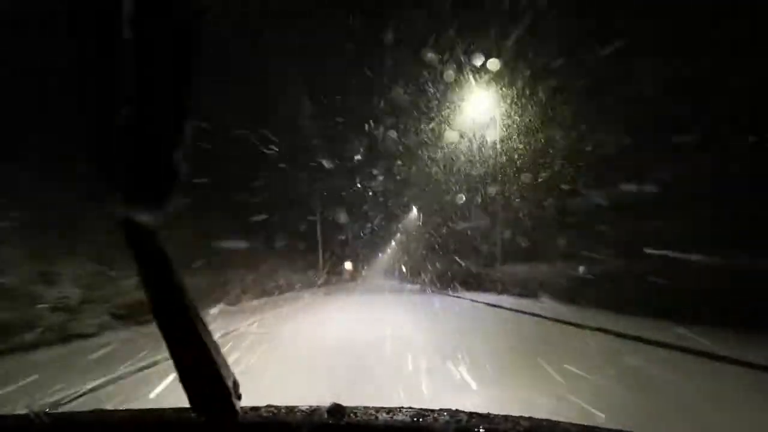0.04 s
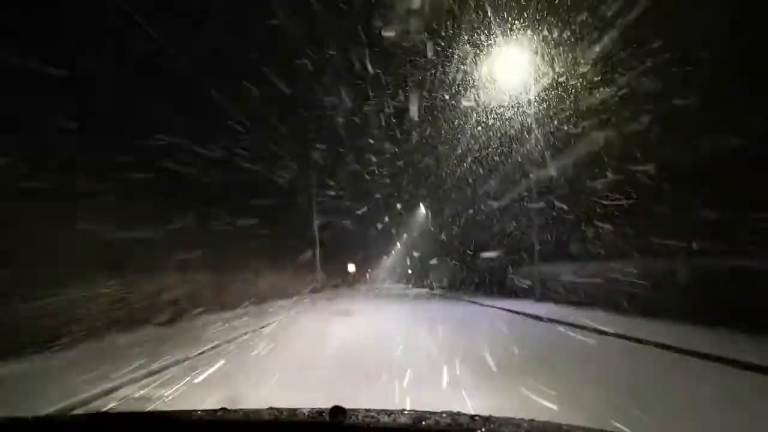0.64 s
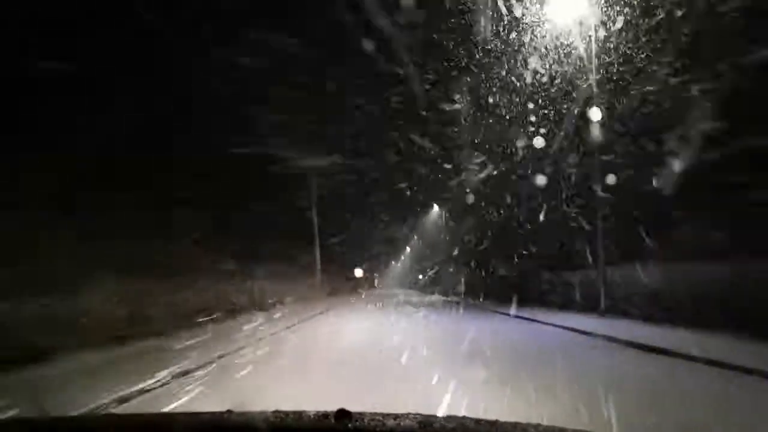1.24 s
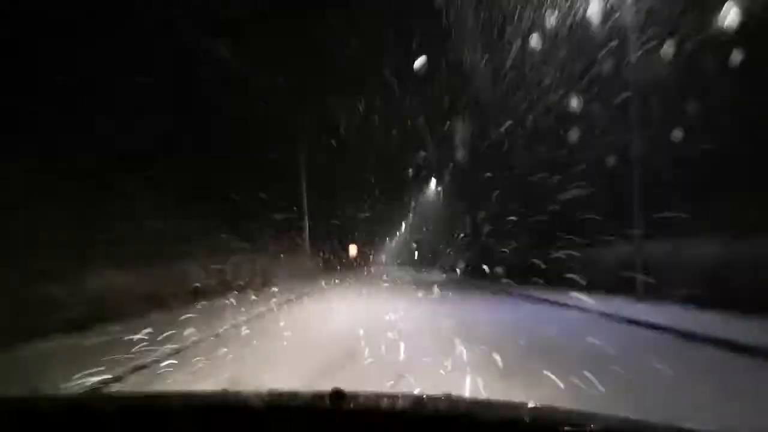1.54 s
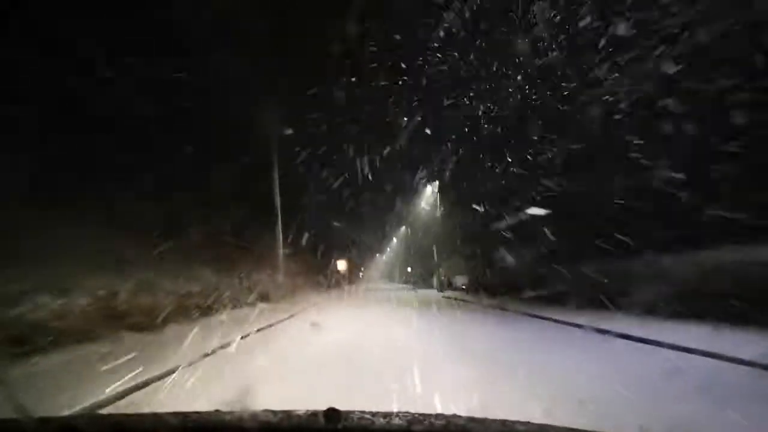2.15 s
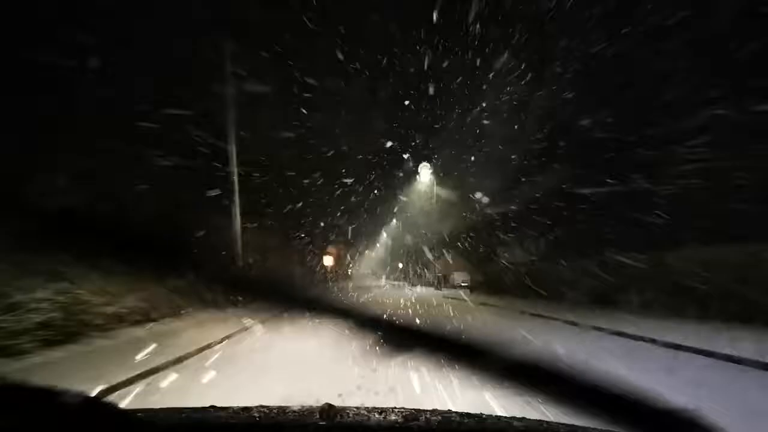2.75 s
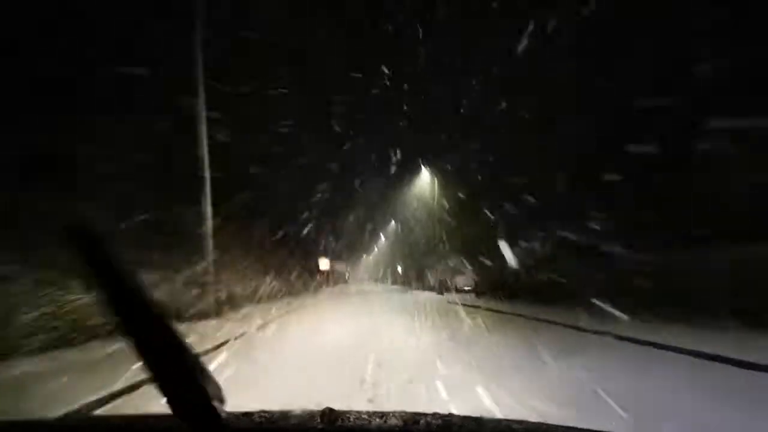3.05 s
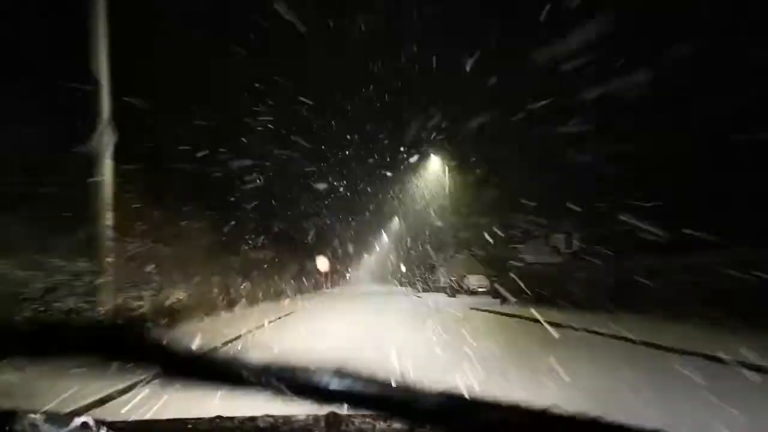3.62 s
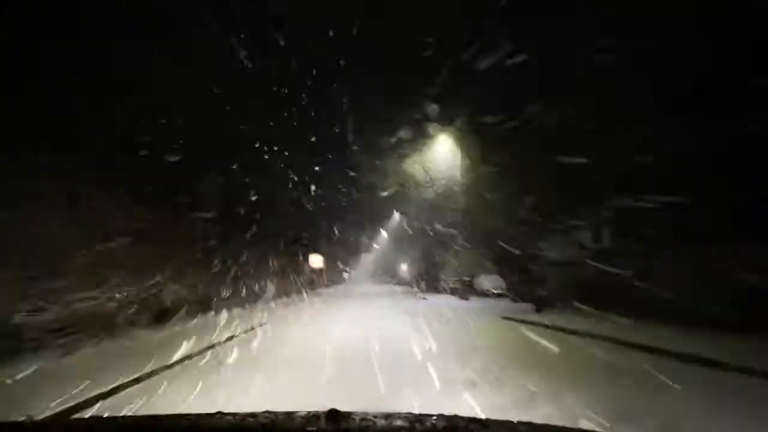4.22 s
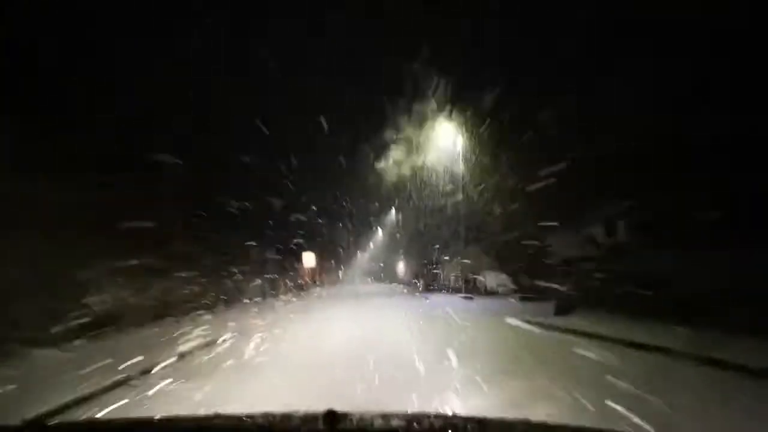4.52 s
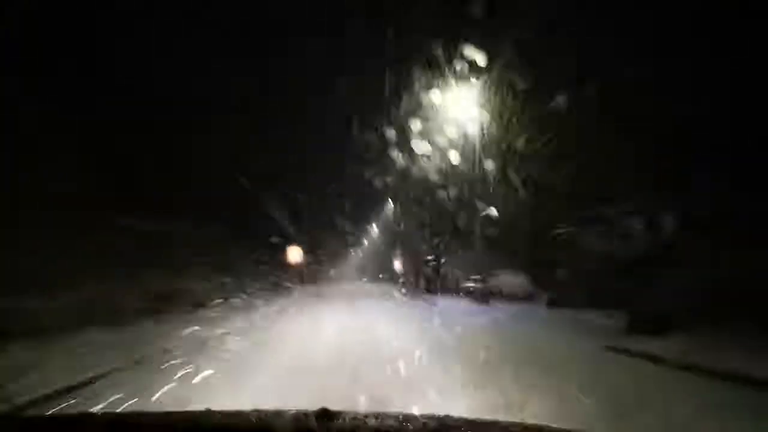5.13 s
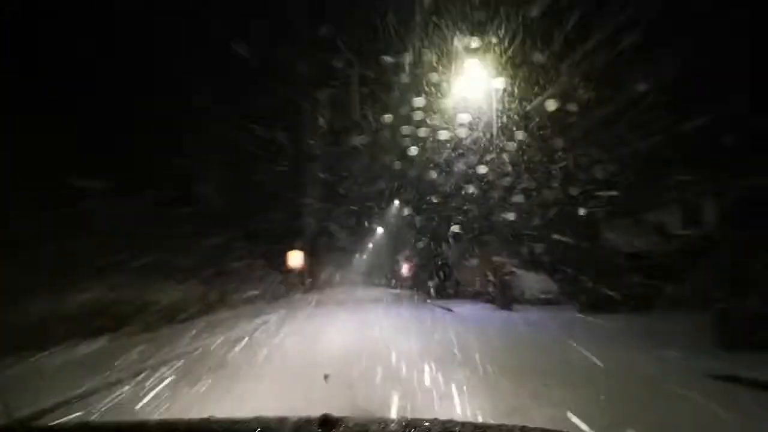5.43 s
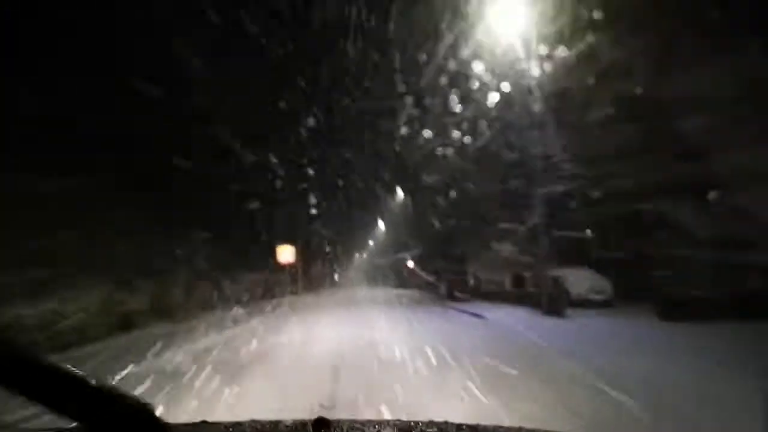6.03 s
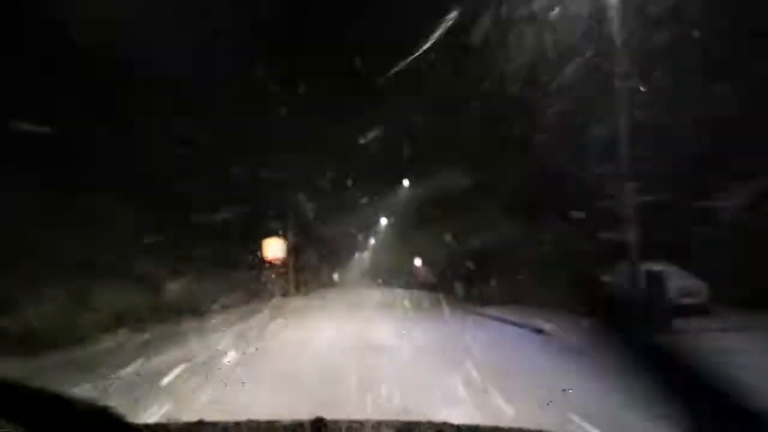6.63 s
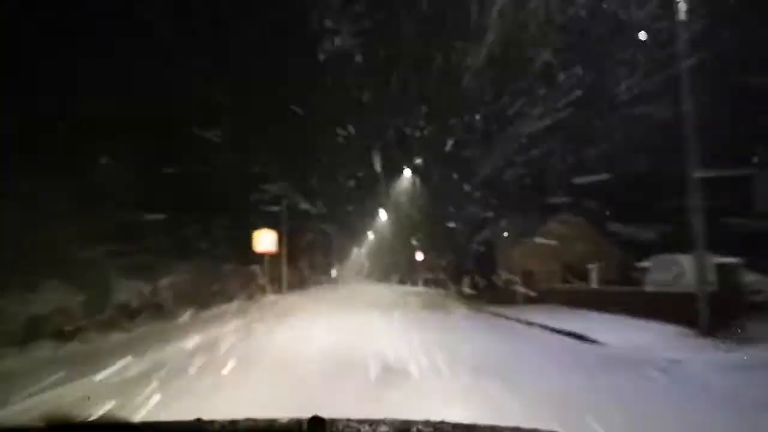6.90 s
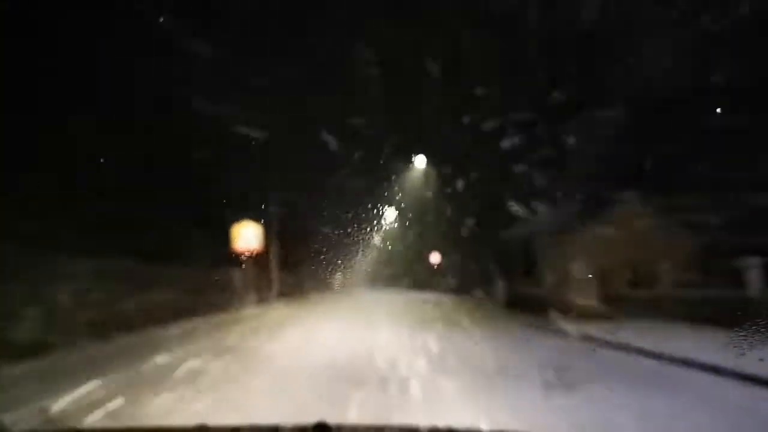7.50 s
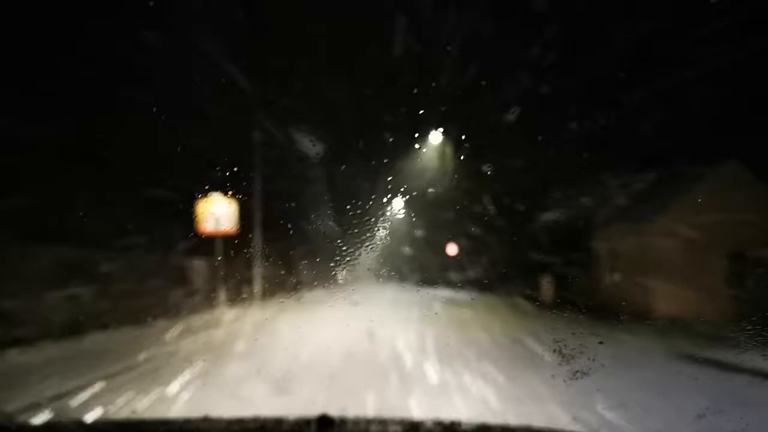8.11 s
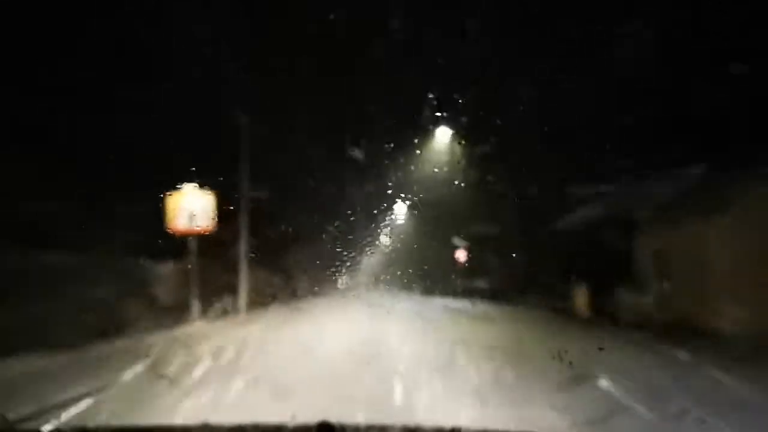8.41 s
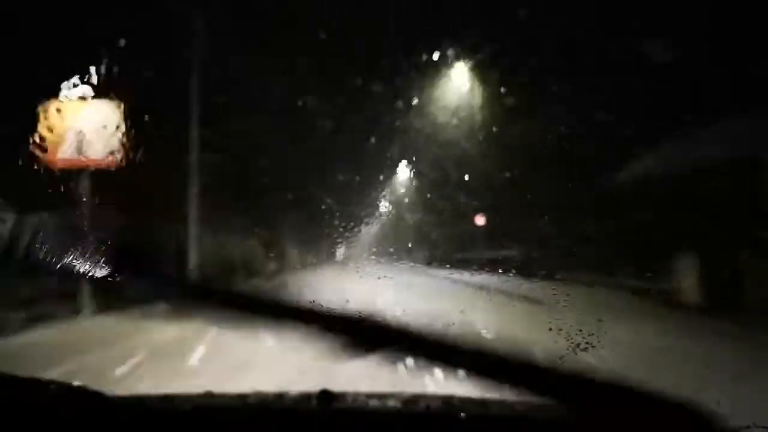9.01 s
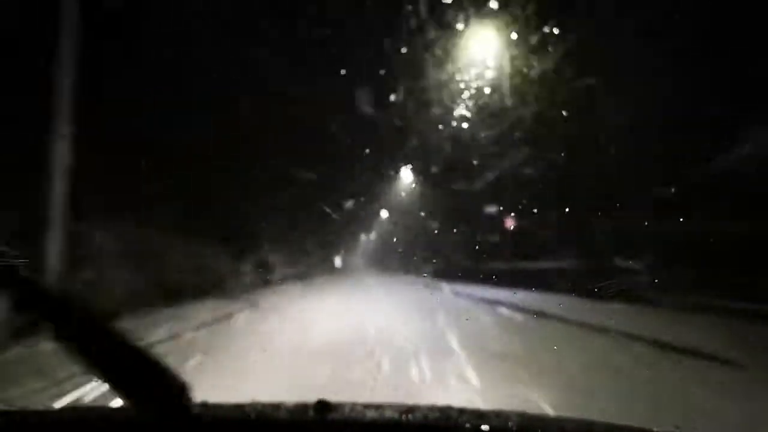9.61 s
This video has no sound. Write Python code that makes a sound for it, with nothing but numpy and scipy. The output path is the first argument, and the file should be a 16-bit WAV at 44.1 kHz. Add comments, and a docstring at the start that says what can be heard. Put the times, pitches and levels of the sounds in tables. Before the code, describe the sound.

A low engine drone and tyre rumble fill a car cabin, with intermittent windscreen wipers, ticking grit and a few dull knocks.

```python
"""Inside a car driving slowly on a snowy road at night. The engine makes the cabin boom, the tyres
rumble and swish, snow hisses finely, and grit and ice tick on the body. Halfway the road turns
rutted: the boom wavers more, the tyres thud and loose plastic trim rattles more often. About every
three seconds the rubber wipers judder loose, squeak, drag back and clack to rest. A few dull knocks
come through the body, the heaviest with a thump."""
import sys
import numpy as np
from scipy.fft import rfft, irfft, next_fast_len
from scipy.io import wavfile
from scipy.ndimage import map_coordinates

SR = 44100
rng = np.random.default_rng(int(sys.argv[2]) if len(sys.argv) > 2 else 0)


def wrap_up_sound(samples):
    """Save the sound to the file named by the first command line argument, as 16-bit audio."""
    columns = np.atleast_2d(samples).T
    # keep every value between -1 and 1, then stretch to whole-number steps
    tamed = np.clip(columns, -1, 1)
    steps = np.round(tamed * 32767).astype(np.int16)
    wavfile.write(sys.argv[1], SR, steps)


N = 429975


def amp(db):
    """Turn decibels into a gain."""
    return 10 ** (np.asarray(db) / 20)


def unit(x):
    """Scale a signal to an average power of 1."""
    return x / np.sqrt(np.mean(x ** 2) + 1e-20)


def along(points, hz):
    """Read between (frequency, value) points on a logarithmic frequency scale."""
    f, v = np.transpose(points)
    return np.interp(np.log(hz + 1), np.log(f + 1), v)


def curve(points):
    """Join (time, value) points with straight lines, one value per sample."""
    return np.interp(np.arange(N) / SR, *np.transpose(points))


def wobble(rate):
    """A smooth curve through `rate` random values a second."""
    return map_coordinates(rng.standard_normal(int(N * rate / SR) + 4), [np.arange(N) * rate / SR])


def swell(peak_s, db, half_s):
    """A level that rises and falls in a bell shape."""
    return amp(db) * np.exp(-((np.arange(N) / SR - peak_s) / half_s) ** 2)


def filtered(x, response):
    """Change the strength and phase of each frequency by response(hz)."""
    size = next_fast_len(N + SR // 2)
    return irfft(rfft(x, size) * response(np.fft.rfftfreq(size, 1 / SR)), size)[..., :N]


def panned(db):
    """Left and right gains; below 0 dB the right is louder."""
    return amp([[db / 2], [-db / 2]])


def strikes(rows, attack, tail_db, tail_t60):
    """Level of (time, level, t60) blows, each with a short cabin echo; t60 is the time to fade 60 dB."""
    t, power = np.arange(SR // 2) / SR, np.zeros(N + SR)
    for s, db, t60 in rows:
        rise = 1 - np.exp(-t / attack)
        fade = amp(-60 * t / max(t60, .005)) + amp(tail_db - 60 * t / tail_t60)
        power[max(round(s * SR), 0):][:len(t)] += (amp(db) * rise * fade) ** 2
    return np.sqrt(power[:N])


# how far the left ear is ahead: (frequency [Hz], phase [radians])
LEFT_LEAD = [(40, .09), (215, 0.26), (350, 1.57), (650, 3), (1200, 0)]
def at_ears(x):
    """The cabin's standing waves reach the left ear first."""
    return filtered(x, lambda hz: np.exp(1j * along(LEFT_LEAD, hz) * np.array([[.5], [-.5]])))


# how alike the sound is at both ears: (frequency [Hz], likeness [0-1])
EAR_LIKENESS = [(50, 1), (125, 0.97), (200, 0.96), (300, .8), (400, 0.38), (1300, 0.22), (3000, 0.045),
                (8000, .03)]
def cabin_noise(spectrum):
    """Stereo noise of power 1 with the given tone colour: centred in the bass, wide in the treble."""
    def colour(hz):
        width = np.arccos(np.clip(along(EAR_LIKENESS, hz), -1, 1)) / 2
        return amp(along(spectrum, hz)) * np.array([np.cos(width), np.sin(width)])
    mid, side = filtered(rng.standard_normal((2, N)), colour)
    return unit(at_ears(np.array([mid + side, mid - side])))


# packed snow turns to ruts: (time [s], roughness [0 = smooth])
ROAD_ROUGHNESS = [(0, 0.2), (3.9, .1), (4.4, 0.1), (5.3, 0.8), (9.75, 1.2)]
def roughness():
    """How rutted the road is at each moment."""
    return curve(ROAD_ROUGHNESS)


# the engine slowly gathers speed: (time [s], firing rate [Hz])
FIRING_RATE = [(0, 42.53), (2, 43.14), (4, 44.3), (7.5, 45.61), (9.75, 45.5)]
# the cabin's boom: (time [s], relative level [dB])
BOOM_LEVELS = [(0.1, -14.5), (2.28, -16), (2.49, -12.5), (3.34, -22.5), (3.45, -15.5), (5.13, -16),
               (5.36, -30), (5.44, -12), (6.64, -17), (7.07, -26.5), (7.25, -9.5), (7.76, -26.5),
               (7.89, -13), (8.08, -34), (8.24, -10.5), (8.77, -21.5), (9.3, -16.5), (9.65, -19.5)]
# the engine's higher tones: (pitch [times the firing rate], relative level [dB])
ENGINE_OVERTONES = [(2, -16.5), (3, -30), (4, -35), (5, -34.5), (6, -39), (7, -42), (10, -57.5)]
def engine(shake_hz=13, shake_limit_db=-15.5):
    """The engine fires at the cabin's lowest natural note; the boom wavers as the road shakes the car."""
    phase = 2 * np.pi * np.cumsum(curve(FIRING_RATE)) / SR
    level = amp(curve(BOOM_LEVELS) - 1.1)
    shake = (.17 + .25 * roughness()) * np.minimum(level, amp(shake_limit_db))
    boom = (level + shake * wobble(shake_hz)) * np.sin(phase)
    boom += shake * wobble(shake_hz) * np.cos(phase)  # the pitch wavers too
    overtones = sum(amp(db - 14.5 + 3.3 * wobble(4)) * np.sin(k * phase + 0.6 * wobble(5))
                    for k, db in ENGINE_OVERTONES)
    return np.sqrt(2) * at_ears(boom + overtones)


# tone colours of the swaying body and the rolling tyres: (frequency [Hz], relative level [dB])
SWAY_COLOUR = [(4, 0), (12, 1), (25, 9), (32, 13.5), (38, 20), (50, 4), (58, -2), (66, -12), (110, -43),
               (400, -130)]
RUMBLE_COLOUR = [(20, -63), (52, -18.5), (63, -6), (76, -0.5), (105, -3), (140, -12), (180, -17.5),
                 (220, -20.5), (242, -28.5), (305, -31), (375, -39.5), (550, -41), (750, -49.5),
                 (1000, -53.5), (3500, -110)]
def road_rumble():
    """Rolling over packed snow makes the car's body sway and rumble."""
    sway = amp(-26) * cabin_noise(SWAY_COLOUR)
    rumble = amp(-23 + 0.37 * roughness()) * cabin_noise(RUMBLE_COLOUR)
    return sway + rumble


# jolts from single ruts: (time [s], level [dB])
RUT_JOLTS = [(5.221, -17), (5.57, -17), (6.5, -18), (7.441, -18), (8.0, -15.5), (8.98, -16), (9.349, -19)]
# tone colour of the air in the tyres: (frequency [Hz], relative level [dB])
TYRE_AIR_COLOUR = [(50, -50.5), (80, -6.5), (97, 2), (112, -4.5), (140, -20.5), (205, -22), (250, -36),
                   (900, -130)]
def tyre_boom():
    """The air inside the tyres booms on rough ground and thuds at each rut."""
    jolts = sum(swell(s, db, half_s=0.063) for s, db in RUT_JOLTS)
    return np.hypot(roughness() * amp(-22), jolts) * cabin_noise(TYRE_AIR_COLOUR)


# treads on snow: (time [s], relative level [dB])
SWISH_LEVELS = [(0.3, -64), (5.35, -61.5), (5.56, -63.5), (7.03, -61.5), (7.37, -63.5), (9.6, -61.5)]
# their tone colour: (frequency [Hz], relative level [dB])
SWISH_COLOUR = [(200, -19), (750, -2), (970, 2), (1100, -1.5), (1320, 2), (1550, -4), (1850, -1),
                (2300, -3.5), (2900, -9), (3700, -12.5), (4600, -18.5), (7000, -32.5), (14000, -83)]
def tyre_swish():
    """The treads swish unevenly through the snow."""
    level = amp(curve(SWISH_LEVELS) + 5.5 + 1.2 * wobble(17))
    return level * cabin_noise(SWISH_COLOUR) * panned(-0.81)


# fine hiss of snow, swelling once as the wipers set off: (time [s], relative level [dB])
HISS_LEVELS = [(0.05, -71.5), (0.45, -73), (1.23, -72.5), (1.42, -67.5), (2.09, -77), (2.49, -75),
               (2.68, -64), (2.95, -72), (4.62, -74.5), (5.24, -69.5), (5.34, -71), (9.7, -73.5)]
# bursts of slush: (time [s], level [dB], rise and fade time [s])
SLUSH_BURSTS = [(1.374, -49.5, 0.022), (4.307, -58, 0.025)]
# tone colours of the hiss and the slush: (frequency [Hz], relative level [dB])
HISS_COLOUR = [(1500, -3.5), (3000, -3.5), (3700, 1), (4700, -3.5), (5700, -0.5), (6600, -4.5), (7800, 0.5),
               (8500, -9), (9400, -9), (10200, -15.5), (16000, -38.5)]
SLUSH_COLOUR = [(2000, -12.5), (3800, 3), (6000, -8), (8000, 1), (9500, -4), (11000, -19), (15000, -33)]
def snow_hiss():
    """A fine crackling hiss of snow, swelling once as the wipers set off, and two splashes of slush."""
    t = np.arange(N) / SR
    crackle = unit(amp(wobble(25) + 2.2 * wobble(500)))
    hiss = amp(curve(HISS_LEVELS) + 6.5) * crackle * cabin_noise(HISS_COLOUR)
    clumps = unit(amp(4.5 * wobble(350)))
    splashes = sum(amp(db) * np.exp(-np.abs(t - s) / fade) for s, db, fade in SLUSH_BURSTS)
    return hiss + splashes * clumps * cabin_noise(SLUSH_COLOUR)


# sharp hits: (time [s], relative level [dB], relative treble [dB], left minus right [dB])
GRIT_HITS = [(0.0772, -43, -10, -1), (1.1887, -40, -19, -13), (1.288, -43, 10, 1), (1.4996, -50, 14, -12.5),
             (1.7665, -47, -20, -15), (2.6974, -39, -16, -8), (2.9881, -48, -10.5, 2),
             (3.1294, -48, -6, -4), (3.213, -43, -18, -8), (3.2813, -43.5, 0, -5), (4.2671, -45, 6.5, 6.5),
             (4.301, -50.5, 14, -1), (4.5334, -37, 8.5, -3), (5.053, -45, -27, -13),
             (5.0695, -36.5, -15, -14.5), (5.3044, -40, 6.5, -3), (6.3592, -42, -9.5, -7.5),
             (9.4058, -42.5, -8, -7.5)]
# their tone colour: (frequency [Hz], relative level [dB])
GRIT_COLOUR = [(400, -20.5), (1500, 5), (3800, 5), (5500, -0.5), (6700, -11.5), (8000, -11), (9500, -25),
               (12000, -34), (16000, -43)]
def grit_ticks(faint_count=170):
    """Grit and ice tick on the body: many faint grains and some clear ones, dull or bright."""
    grain = cabin_noise(GRIT_COLOUR)
    treble = filtered(grain, lambda hz: 1 / (1 + (6800 / (hz + 1)) ** 8))
    faint = [(when * N / SR, -66 + 13 * size ** 3, .03) for when, size in rng.random((faint_count, 2))]
    ticks = grain * strikes(faint, attack=0.00032, tail_db=-14.5, tail_t60=.15) * panned(-7.0)
    for s, db, treble_db, pan_db in GRIT_HITS:
        blow = strikes([(s, db - 7.5, .034)], attack=0.00057, tail_db=-19, tail_t60=.2)
        ticks += blow * panned(pan_db) * (grain + (amp(treble_db + 8.5) - 1) * treble)
    return ticks


# notes the plastic rings at: (frequency [Hz], width [Hz], relative level [dB])
TRIM_NOTES = [(556, 150, -6), (980, 110, -3), (1305, 100, 3), (1825, 75, 0), (1955, 67, -2.5),
              (2290, 84, -1), (3610, 290, -14), (5500, 620, -30)]
# its clear taps: (time [s], relative level [dB])
TRIM_TAPS = [(0.552, -50), (0.592, -53.5), (1.2589, -45), (1.309, -45), (1.3553, -49.5), (4.227, -48.5),
             (4.2662, -41.5), (4.348, -41.5), (4.3968, -47), (4.5332, -47), (5.1415, -41.5), (5.199, -50),
             (5.3037, -45), (5.4029, -44), (5.4764, -47), (5.727, -49), (6.4815, -48), (6.539, -48),
             (6.62, -40), (6.7005, -51), (6.87, -48), (7.173, -50.5), (7.6245, -48), (8.083, -51),
             (8.145, -49), (8.4533, -53), (8.7525, -49.5), (9.118, -47.5), (9.3871, -44)]
def trim_rattle(faint_count=110):
    """A loose plastic panel taps and chatters on the right, with faint touches between the clear ones."""
    def plastic(hz):
        ring = sum((-1) ** k * amp(db) * 1j * hz * width / (note ** 2 - hz ** 2 + 1j * hz * width)
                   for k, (note, width, db) in enumerate(TRIM_NOTES))
        return ring / (1 + (hz / 6500) ** 6)  # the touch is too soft for the highest treble
    faint = [(when * N / SR, -57 + 8 * size, .025) for when, size in rng.random((faint_count, 2))]
    clear = [(s, db, .028) for s, db in TRIM_TAPS]
    touches = strikes(clear + faint, attack=0.00016, tail_db=-16, tail_t60=0.11)
    chatter = touches * rng.standard_normal((2, N))
    times, levels = np.transpose(TRIM_TAPS)
    taps = np.bincount(np.round(times * SR).astype(int), amp(levels + 13.5), N)  # clean first touches
    return amp(16.5) * filtered(taps + chatter, plastic) * panned(-8.5)


# wipes, the first already under way; levels are relative:
# (start [s], judder [dB], squeak [dB], drag [dB], landing [dB])
WIPER_STROKES = [(-0.543, -30, -54, -65.5, -37.5), (2.599, -33, -53.5, -57.5, -41.5),
                 (5.738, -28.5, -53.5, -64, -39), (8.885, -27.5, -53, -70, -38)]
# the blades break loose: (time from the start [s], relative level [dB])
BLADE_JUDDER = [(-.009, -8.5), (0, 0), (.0085, -3.5)]
# the rubber slips: (time from the start [s], relative level [dB], half length [s])
RUBBER_SLIPS = [(0, -3, 0.024), (0.06, -0.5, .02), (0.187, -8, .035)]
# two blades land and settle: (time from the first landing [s], relative level [dB])
BLADE_LANDINGS = [(0, -1), (.011, 0.5), (.043, -9.5)]
# tone colours of the four wiper sounds: (frequency [Hz], relative level [dB])
JUDDER_COLOUR = [(300, 16), (1500, -3.5), (2700, -3), (3300, 1.5), (3850, 9.5), (4800, -15), (5700, 5),
                 (6600, -12), (7800, -5.5), (9000, -37), (12000, -41.5), (16000, -52.5)]
SQUEAK_COLOUR = [(1000, -38.5), (3000, -12), (3600, -1), (3950, 1), (4500, -16), (5700, -2), (6500, -20.5),
                 (7500, -11), (9000, -25), (16000, -64.5)]
DRAG_COLOUR = [(300, -10), (1000, -2), (2200, 0.5), (3200, -6.5), (5000, -15.5), (9000, -32.5),
               (15000, -61.5)]
CLACK_COLOUR = [(200, -18.5), (1500, -12), (2600, -5.5), (3500, 0), (4100, -4), (5000, -8.5), (6500, -16.5),
                (7700, -13), (9200, -29), (16000, -52.5)]
def wipers(drag_peak_s=1.15, wipe_s=1.327):
    """The blades judder loose, squeak as they set off, drag back over wet glass and clack to rest."""
    starts = [(s + after, db + rel, 0.026)
              for s, db, *_ in WIPER_STROKES if s > 0 for after, rel in BLADE_JUDDER]
    judder = strikes(starts, attack=0.00033, tail_db=-28, tail_t60=0.23) * cabin_noise(JUDDER_COLOUR)
    chatter = unit(amp(3.9 * wobble(220)))  # the rubber sticks and slips
    slips = sum(swell(s + after, db + rel, half_s)
                for s, _, db, *_ in WIPER_STROKES for after, rel, half_s in RUBBER_SLIPS)
    squeaks = slips * chatter * cabin_noise(SQUEAK_COLOUR)
    way_back = sum(swell(s + drag_peak_s, db, half_s=0.3) for s, *_, db, _ in WIPER_STROKES)
    drag = way_back * cabin_noise(DRAG_COLOUR)
    landings = [(s + wipe_s + after, db + rel, .075)
                for s, *_, db in WIPER_STROKES if s + wipe_s < N / SR for after, rel in BLADE_LANDINGS]
    clacks = strikes(landings, attack=0.0012, tail_db=-22.5, tail_t60=0.19) * cabin_noise(CLACK_COLOUR)
    rubbing = (squeaks + drag) * panned(-1.5)
    return amp(-0.5) * judder * panned(-4) + rubbing + amp(-4) * clacks * panned(-2.7)


# dull knocks: (time [s], level [dB], time to fade 60 dB [s])
BODY_KNOCKS = [(0.99, -34, .1), (2.59, -30, 0.17), (2.748, -29, 0.088), (2.762, -25, 0.11),
               (2.778, -20, 0.066), (4.525, -30, 0.099), (8.87, -34, .13)]
# their tone colour: (frequency [Hz], relative level [dB])
KNOCK_COLOUR = [(100, -4), (290, 4.5), (420, -4), (560, -8), (750, -20.5), (1100, -20), (2300, -26.5),
                (3600, -31), (6000, -40.5), (10000, -55.5), (16000, -75)]
# notes of a body panel: (frequency [Hz], relative level [dB], time to fade 60 dB if left free [s])
PANEL_NOTES = [(110, -11.5, .35), (151.7, -4.5, .35), (279.4, -19.5, 0.49)]
def body_knocks(thump_s=2.762):
    """Dull knocks pass through the body; the heaviest briefly swings a panel and makes it thump."""
    t = np.maximum(np.arange(N) / SR - thump_s, 0)
    push = np.exp(-((t - .016) / 0.011) ** 2)  # the soft contact swells and lets go
    swing = sum(amp(db - 60 * t / t60) * np.sin(2 * np.pi * hz * t) for hz, db, t60 in PANEL_NOTES)
    knocks = strikes(BODY_KNOCKS, attack=0.002, tail_db=-29, tail_t60=0.31) * cabin_noise(KNOCK_COLOUR)
    return push * swing + knocks


def scene():
    """Everything as heard from the front seat."""
    driving = engine() + road_rumble() + tyre_boom() + tyre_swish() + snow_hiss()
    return driving + trim_rattle() + grit_ticks() + wipers() + body_knocks()


def record(dry, low_hz=5, top_hz=15700):
    """The microphone adds a faint hiss and loses the deepest sway and the highest treble."""
    hiss = amp(-82.5) * rng.standard_normal(N)
    return filtered(dry + hiss, lambda hz: (hz < top_hz) * hz / np.hypot(hz, low_hz))


dry = scene()
out = record(dry)
wrap_up_sound(out)
```